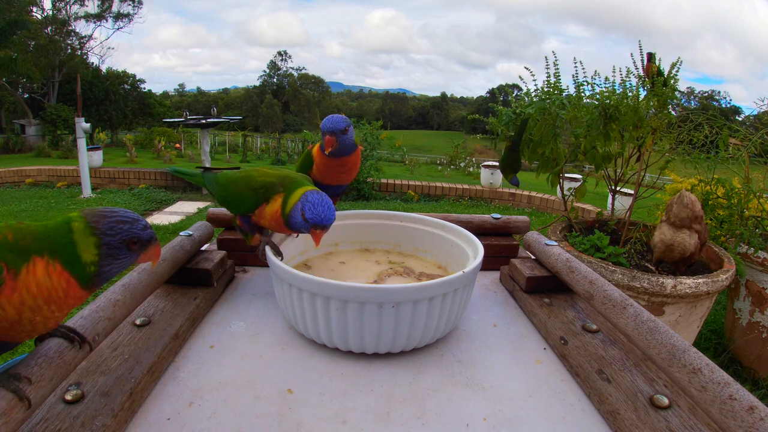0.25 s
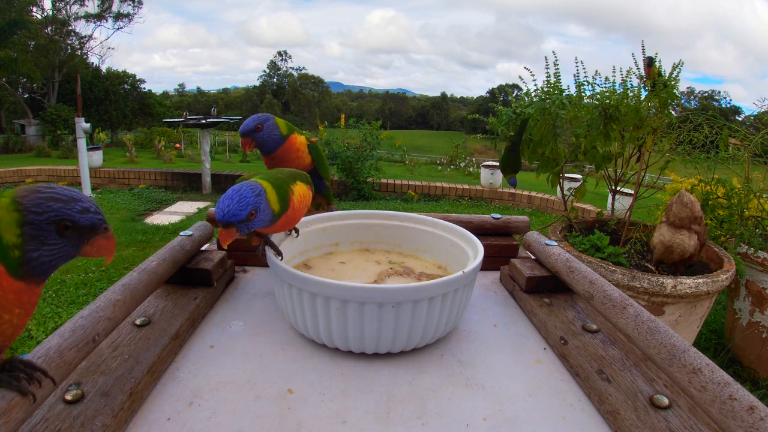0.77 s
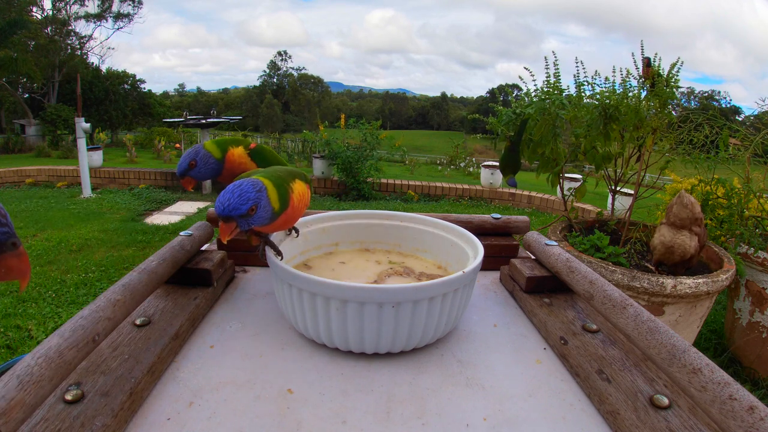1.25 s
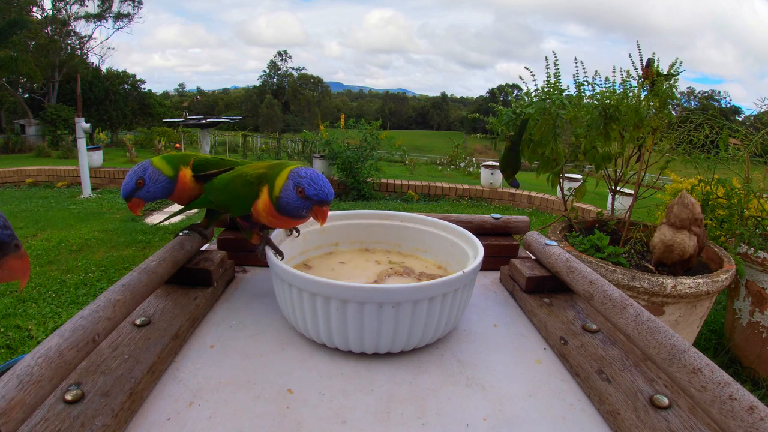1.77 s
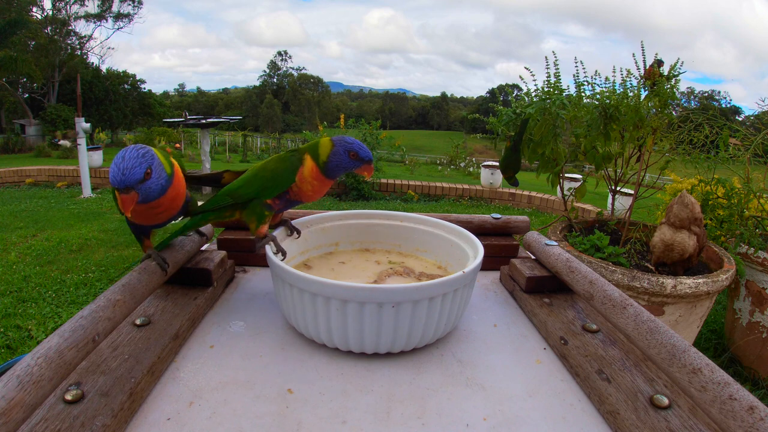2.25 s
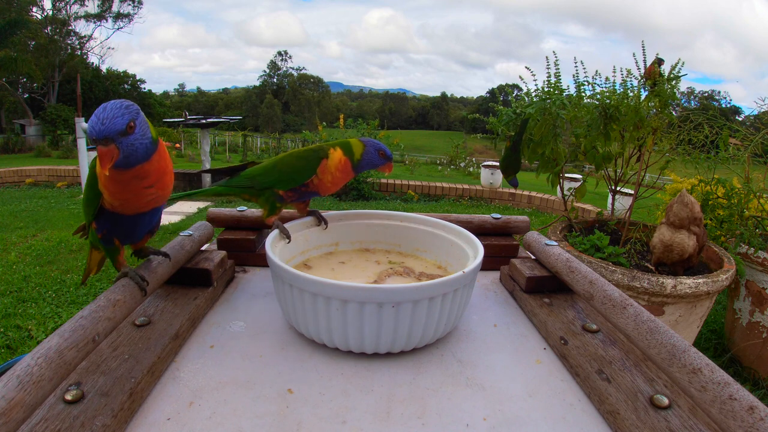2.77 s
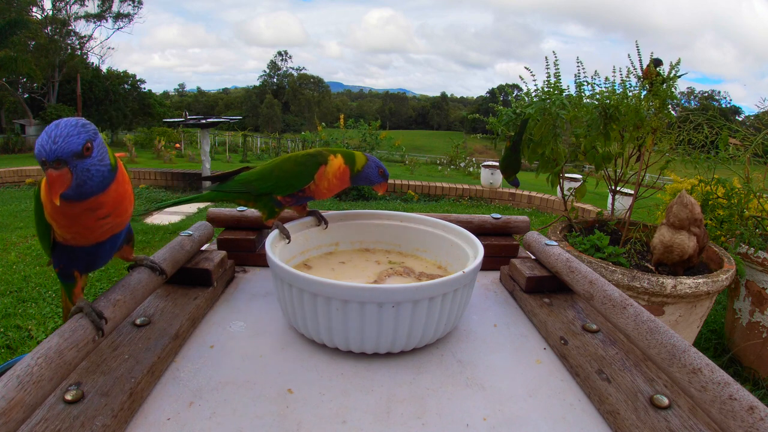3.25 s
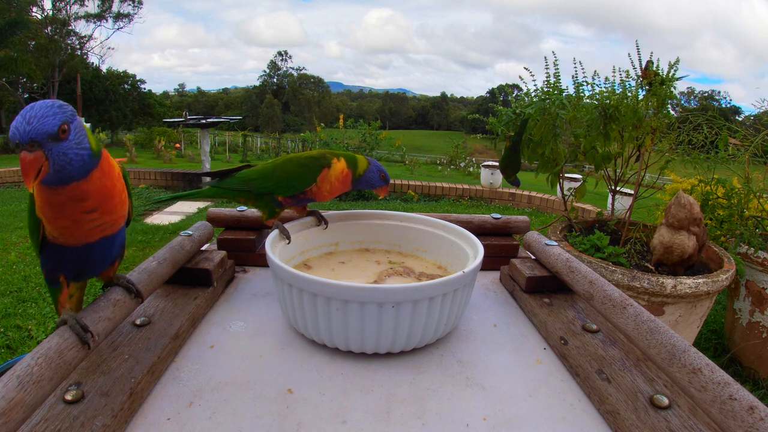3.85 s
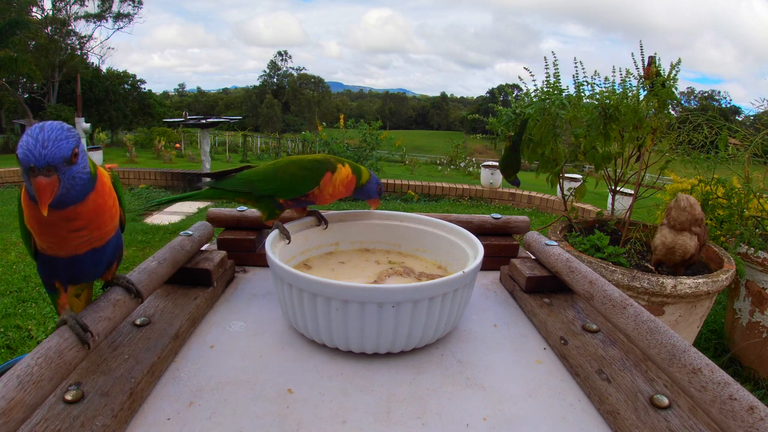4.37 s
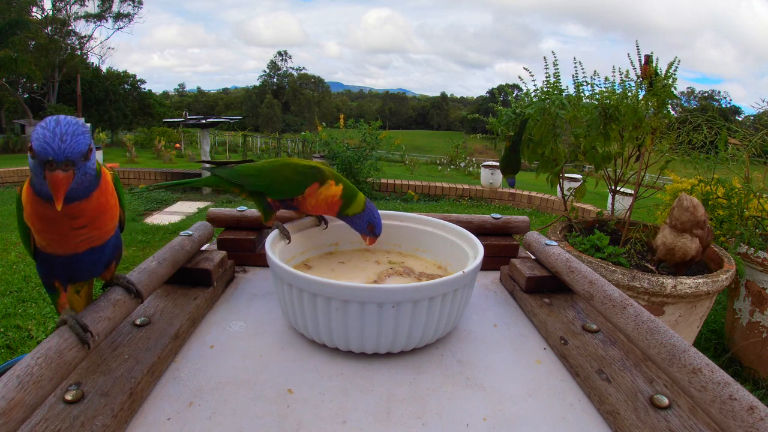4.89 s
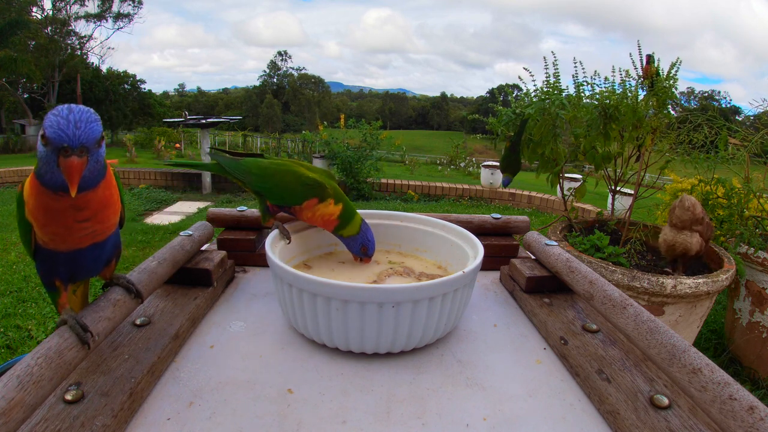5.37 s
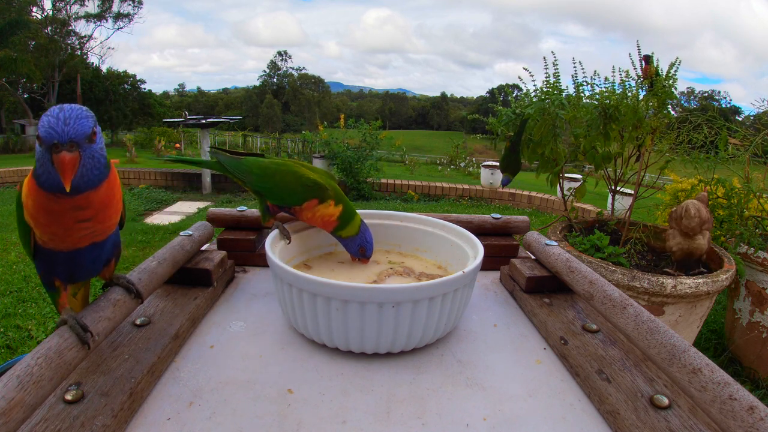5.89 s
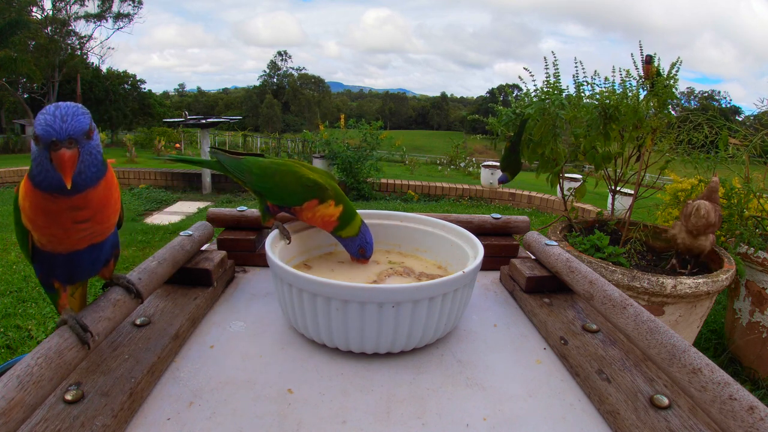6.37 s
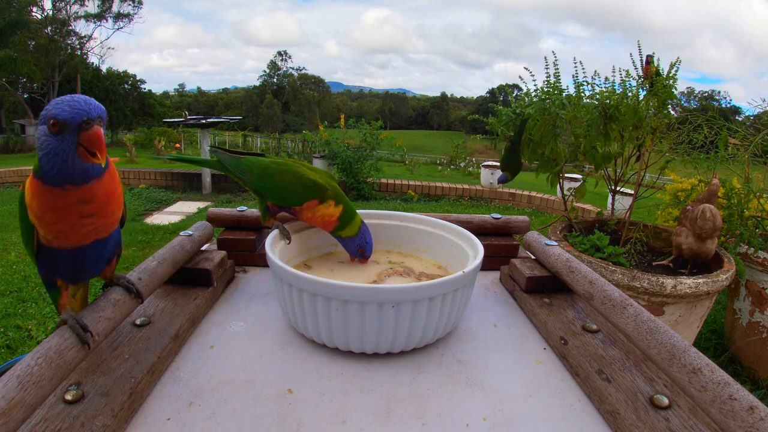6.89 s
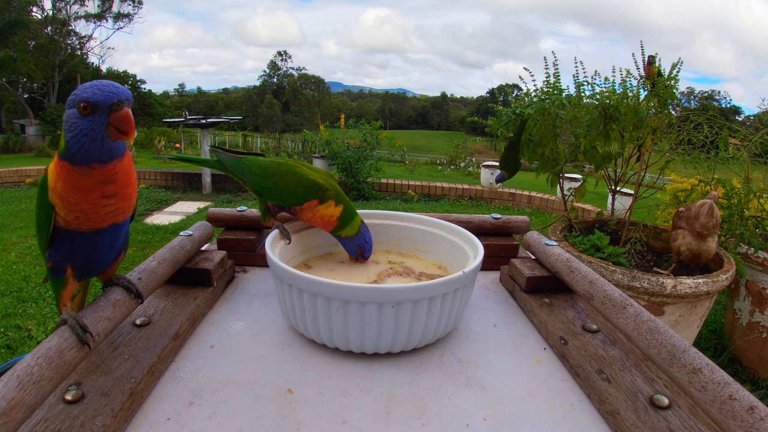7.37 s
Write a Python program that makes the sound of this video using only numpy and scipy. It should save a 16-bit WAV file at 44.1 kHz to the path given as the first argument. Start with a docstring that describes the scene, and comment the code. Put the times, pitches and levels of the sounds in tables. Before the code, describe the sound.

Lorikeets call very close to a stereo microphone in an open garden. Short chirps open, then a harsh fluttering rasp and a sharp upward screech, a softer rasp, arching whistles and another screech. Quick chatter follows in bursts, with a brief wing flutter and a foot knocking on wood midway. Faint birds answer from trees over low hush and wind thumps.

```python
"""An open garden with a feeding bowl: lorikeets call close to a stereo microphone.
Membrane voices with throat-weighted overtones whistle, chatter and screech in two voices; two rasps
are pulse trains shaken by a flutter. Thin wavering tones answer from the trees.
Noise bursts make wings and a foot on a wooden rail; scattered echoes follow the calls.
Band noise makes the low country hush, a wavering hum and wind gusts on the microphone."""
import sys
import numpy as np
from scipy import signal
from scipy.io import wavfile
from scipy.ndimage import uniform_filter1d

SR = 44100
rng = np.random.default_rng(int(sys.argv[2]) if len(sys.argv) > 2 else 0)


def put_to_file(sound):
    """Save the sound as 16-bit audio at rate SR, in the file named by the first command-line argument."""
    columns = np.atleast_2d(sound).T  # one column per channel
    safe = np.clip(columns, -1, 1)
    whole_steps = np.round(safe * 32767)
    wavfile.write(sys.argv[1], SR, whole_steps.astype(np.int16))


N = 336483
T = np.arange(N) / SR
TOP_HZ = 15600


def undb(db):
    """Amplitude of a level in dB."""
    return 10 ** (np.asarray(db) / 20)


def band(x, lo_hz, hi_hz, order=2):
    """Butterworth band-pass."""
    return signal.sosfilt(signal.butter(order, [lo_hz, hi_hz], "band", fs=SR, output="sos"), x)


def unit(x):
    """Scales x to rms 1."""
    return x / np.sqrt(np.mean(x ** 2))


def noise(size=N):
    """White noise."""
    return rng.standard_normal(size)


def walk(rate_hz, size=N):
    """Smooth random curve of rms 1 that varies on the scale of 1 / rate_hz."""
    k = max(int(SR / rate_hz), 2)
    smooth = uniform_filter1d(uniform_filter1d(noise(size + 4 * k), k), k)
    return unit(smooth[2 * k:2 * k + size])


def turns(hz):
    """Phase in radians of a tone that follows a pitch curve."""
    return 2 * np.pi * np.cumsum(hz) / SR


def decay(t, t60_s):
    """Exponential decay by 60 dB in t60_s."""
    return np.exp(-np.log(1000) * t / t60_s)


def add(out, start_s, x):
    """Mixes x into out from start_s."""
    i = int(start_s * SR)
    a, b = max(i, 0), min(i + len(x), N)
    out[a:b] += x[a - i:b - i]


def played(rows, edge_s=0.0016):
    """Start, fade at both ends, and columns of a timed curve at every sample."""
    s, *columns = np.transpose(rows)
    t = np.arange(s[0] - edge_s, s[-1] + edge_s, 1 / SR)
    fade = np.clip(np.minimum(t - t[0], t[-1] - t) / edge_s, 0, 1)
    return t[0], fade, [np.interp(t, s, c) for c in columns]


# Throat response. Each row: frequency in Hz, overtone gain in dB.
THROAT = [(600, -6), (2000, 33.5), (3400, -5.5), (5000, 3), (6600, 1.5), (8000, -14.5), (10000, -19),
          (11500, -54.5), (15000, -33.5)]


def voice(hz, over_db, rough_rad, throat=THROAT):
    """Membrane tone of rms 1: the throat weighs its overtones, uneven cycles blur the upper ones."""
    phase = turns(hz) + rough_rad * walk(1500, size=len(hz))
    f, db = np.transpose(throat)
    tone, power = np.sin(phase), 1
    for k in range(2, 10):
        gain = undb(over_db + np.interp(np.log(k * hz), np.log(f), db)) * (k * hz < TOP_HZ)
        tone = tone + gain * np.sin(k * phase + k - 2)
        power = power + gain ** 2
    return np.sqrt(2 / power) * tone, phase


# Each row: start in seconds, rise in seconds, hold in seconds, top pitch in Hz, second voice in Hz,
# direct level in dB, second voice offset in dB, echo send in dB.
SCREECHES = [(-.025, 0.078, 0.0048, 2470, 3000, -44, -7, -44),
             (0.983, 0.077, 0.037, 2530, 3168, -23, -7.5, -45),
             (2.318, 0.087, 0.035, 2473, 3160, -22.5, -7.5, -48),
             (3.524, 0.1, 0.0056, 2593, 3050, -36, -9, -41),
             (3.997, 0.086, 0.031, 2420, 3040, -22, -7, -45.5),
             (4.546, 0.11, 0.021, 2560, 2980, -33.5, -9.5, -38),
             (5.346, .088, 0.025, 2438, 3094, -23, -6, -42.5),
             (5.404, 0.057, 0.035, 2560, 3220, -41.5, -31, -39),
             (6.797, 0.085, 0.1, 2609, 3050, -42, -22, -41.5),
             (6.936, 0.08, 0.038, 2462, 3050, -21.5, -3.5, -47.5)]
# Shape. Each row: stage (0-1 rise, then 1 plus hold lengths), first voice in dB, overtones in dB,
# second voice in dB, hiss in dB.
SCREECH_SHAPE = [(0, -44, -7, -61, -38.5), (0.229, -12.5, 12, -52, -25.5), (.42, -10, 2, -58.5, -14),
                 (0.699, -5, -1.5, -14.5, -17), (.93, -4, 0.5, 1.5, -31.5), (0.998, -2, -5, -3, -25),
                 (1.85, -8, -12, -3, -25), (2.299, -37, -28, -29, -46.5)]
# Climb. Each row: stage, first voice as share of top pitch, second voice as share of its pitch.
SCREECH_CLIMB = [(0, .45, .8), (.23, .56, .8), (.42, .73, .8), (.72, .85, .86), (.93, .965, .985),
                 (1, 1, 1)]
# Each row: frequency in Hz, overtone gain in dB.
SCREECH_THROAT = [(2400, 27), (3600, 0), (4600, -6.5), (5500, -17.5), (6600, 0), (8000, -27.5),
                  (10000, -19), (12000, -52.5)]
SETTLED_ROUGH_RAD, SLACK_ROUGH_RAD = .06, .6


def screeches():
    """Both sides of the syrinx glide up and settle; their clash adds sum and difference tones."""
    near, echo = np.zeros(N), np.zeros(N)
    for start_s, rise_s, hold_s, top_hz, second_hz, db, second_db, echo_db in SCREECHES:
        rows = [(min(u, 1) * rise_s + max(u - 1, 0) * hold_s, u, *rest) for u, *rest in SCREECH_SHAPE]
        _, fade, (stage, a_db, over_db, b_db, hiss_db) = played(rows)
        at, *shares = np.transpose(SCREECH_CLIMB)
        up_a, up_b = (np.interp(stage, at, share) for share in shares)
        # the slacker the membrane, the rougher
        rough = SETTLED_ROUGH_RAD + SLACK_ROUGH_RAD * (1 - up_a)
        a, pa = voice(top_hz * up_a, over_db, rough, SCREECH_THROAT)
        pb = turns(second_hz * up_b)
        clash = undb(-14) * np.sin(pa + pb) + undb(-18) * np.sin(2 * pb)
        clash = clash + undb(-22) * np.sin(2 * pb - pa) + undb(-28) * np.sin(2 * pa - pb)
        second = undb(b_db + second_db) * (np.sqrt(2) * np.sin(pb) + clash)
        # air rushes past once every second cycle: faint half-pitch lines
        rush = band(np.cos(pa / 2) ** 21, 2400, 8000, order=4)
        hiss = unit(band(noise(len(a)), 2000, 7500, order=3) + .8 * rush)
        first = undb(a_db) * a + undb(hiss_db + 2.5 * walk(340, size=len(a))) * hiss
        add(near, start_s, undb(db) * band(fade * (first + second), 910, 6600, order=3))
        add(echo, start_s, undb(echo_db) * band(fade * first, 1200, 7000, order=3))
    return near, echo


# Spectrum. Each row: frequency in Hz, relative gain of white noise in dB.
HUSH_SPECTRUM = [(59, -31), (100, -5), (140, 4), (456, 7.5), (735, 10.5), (1200, -11.5), (1500, -13.5),
                 (1950, -29.5), (3300, -120)]
# Each row: time in seconds, level in dB.
HUSH_LEVEL = [(0, -57), (1.2, -72.5), (2.25, -73), (3.0, -63.5), (3.61, -56.5), (4.33, -71), (4.82, -62),
              (6.08, -73.5), (7.63, -63.5)]


def hush():
    """Low noise in half-octave bands that swell together and flicker alone."""
    f, db = np.transpose(HUSH_SPECTRUM)
    swell_db = 1.5 * walk(0.87)
    out = np.zeros(N)
    for hz in 45 * 2 ** np.arange(0, 5.6, .5):
        level_db = np.interp(np.log(hz), np.log(f), db) + swell_db + 2.5 * walk(5)
        out += undb(level_db) * band(noise(), hz / 2 ** .25, hz * 2 ** .25)
    return undb(np.interp(T, *np.transpose(HUSH_LEVEL))) * unit(out)


def hum():
    """Narrow noise round a low pitch, wavering in level."""
    hz, db = 128, -74.5
    return undb(db + 7.4 * walk(2.65)) * unit(band(noise(), hz - 14, hz + 14, order=1))


EDGE_S, ATTACK_S = .0031, 0.0034


def clock(length_s):
    """Seconds into a note, held still over the fades at both ends."""
    return np.clip(np.arange(-EDGE_S, length_s + EDGE_S, 1 / SR), 0, length_s)


# Each row: start in seconds, length in seconds, start and end pitch in Hz, start and end level in dB,
# overtones in dB.
GLIDES = [(0, 0.02, 1645, 2110, -31, -35, -7), (0.049, 0.036, 1684, 1810, -35, -36, -11),
          (0.375, 0.027, 1873, 1987, -32, -29, -4), (.392, 0.033, 1607, 1658, -32.5, -32.5, -9),
          (0.567, 0.028, 1975, 2065, -34.5, -31.5, -7), (3.487, 0.015, 2140, 2270, -53, -41.5, -10),
          (3.969, .004, 1996, 1940, -50, -39, -14.5), (3.980, 0.012, 2106, 2510, -28, -31, 0),
          (5.127, 0.011, 1730, 1773, -25, -29.5, 0), (5.731, 0.0097, 2310, 2270, -47, -35.5, 3),
          (5.769, 0.015, 2050, 1960, -31, -67, -11.5), (6.038, 0.023, 2436, 2333, -29.5, -30, -3.5),
          (6.154, 0.012, 2430, 2590, -29, -38, -1)]


def glides():
    """Pitch and level each run straight from start to end."""
    for start_s, length_s, hz0, hz1, db0, db1, over_db in GLIDES:
        u = clock(length_s) / length_s
        yield start_s, hz0 + (hz1 - hz0) * u, db0 + (db1 - db0) * u, over_db


OVERTONES_PER_DB, SHIMMER_DB = 0.75, 0.7
NOTE_ROUGH_RAD, NOTE_WOBBLE_SHARE = .06, .005


def chatter():
    """Clean notes from membrane voices, trilled in places; overtones thin out as a note weakens."""
    out = clucks()
    fall, fade_db = trills()
    # each kind yields start s, pitch curve Hz, level curve dB, overtones dB, throat if its own
    for kind in (glides, slides, low_notes, arches, steps, hooks, peeps):
        for start_s, hz, db, over_db, *throat in kind():
            n = len(hz)
            i = np.arange(n)
            fade = np.clip(np.minimum(i / ATTACK_S, i[::-1] / EDGE_S) / SR, 0, 1)
            at = np.clip(int((start_s - EDGE_S) * SR) + i, 0, N - 1)
            pitch = hz * (1 - fall[at] + NOTE_WOBBLE_SHARE * walk(120, size=n))
            thinned_db = over_db + OVERTONES_PER_DB * (db - db.max())
            tone, _ = voice(pitch, thinned_db, NOTE_ROUGH_RAD, *throat)
            level_db = db - fade_db[at] + SHIMMER_DB * walk(180, size=n)
            add(out, start_s - EDGE_S, fade ** 2 * undb(level_db) * tone)
    return out


# Each row: start in seconds, end in seconds, period in seconds, pitch fall as share, fade in dB.
TRILLS = [(0.051, .088, 0.011, 0.3, 14), (5.814, 5.87, .013, 0.11, 14)]


def trills():
    """Pitch falls through each beat and jumps back; level dips where the beats meet."""
    fall, fade_db = np.zeros(N), np.zeros(N)
    for start_s, end_s, period_s, share, db in TRILLS:
        beat = ((T - start_s) / period_s % 1 - .5) * (T > start_s) * (T < end_s)
        fall += share * beat
        fade_db += db * (2 * beat) ** 4
    return fall, fade_db


# Each row: start in seconds, seconds to the bend, seconds to the snap, opening, bend, pre-snap and
# snap pitch in Hz, opening, bend and closing level in dB, overtones in dB.
SLIDES = [(0.089, .045, .071, 1818, 2010, 1420, 1840, -29.5, -35.5, -33.5, -7.5),
          (0.181, 0.059, 0.087, 1682, 1964, 1472, 1830, -27.5, -39, -32.5, -9.5),
          (.289, 0.044, 0.076, 1637, 1748, 1400, 2090, -28.5, -29.5, -33.5, -10.5),
          (.598, 0.0217, .041, 1933, 2038, 2330, 2350, -32.5, -24, -31.5, -4),
          (5.822, 0.059, 0.092, 2058, 2244, 1824, 2370, -25.5, -28.5, -29, -6),
          (5.933, 0.012, 0.059, 2358, 2290, 1770, 2440, -27, -24.5, -30, -6),
          (6.009, .016, 0.028, 2474, 2174, 1725, 2370, -26, -24, -30.5, -5),
          (6.066, 0.014, .027, 1916, 2135, 1945, 2640, -26.5, -25, -28.5, -5.5),
          (6.124, 0.017, .022, 2316, 2200, 1860, 2420, -25.5, -24.5, -32, -3.5),
          (6.174, .023, 0.032, 1908, 2253, 2100, 2500, -28.5, -26, -28.5, -2),
          (6.229, 0.031, 0.036, 2384, 2180, 1960, 2660, -26, -24.5, -26.5, 1)]
CLIMB_TIME_SHARE, CLIMB_SHARE, SNAP_S, SNAP_DB = .3, 0.62, 0.0024, 4


def slides():
    """Notes glide, bend and snap to a new pitch as they close."""
    for start_s, bend_s, snap_s, open_hz, bend_hz, low_hz, snap_hz, db, bend_db, low_db, over_db in SLIDES:
        end_s = snap_s + SNAP_S
        t = clock(end_s)
        climb_hz = open_hz + CLIMB_SHARE * (bend_hz - open_hz)
        pitch = np.interp(t, [0, CLIMB_TIME_SHARE * bend_s, bend_s, snap_s, end_s],
                          [open_hz, climb_hz, bend_hz, low_hz, snap_hz])
        level = np.interp(t, [0, bend_s, (bend_s + snap_s) / 2, snap_s, end_s],
                          [db, bend_db, low_db, low_db, low_db + SNAP_DB])
        yield start_s, pitch, level, over_db


# Each row: start in seconds, level in dB, 60 dB fade in seconds.
GUSTS = [(0.308, -50, 0.35), (1.264, -70.5, 0.28), (1.393, -61, 0.35), (1.824, -62, 0.74),
         (2.268, -64.5, 0.38), (2.523, -60, 1), (2.999, -50, 0.53), (3.227, -46.5, 0.25),
         (3.438, -44.5, 0.63), (3.699, -48.5, 0.38), (3.922, -53.5, 1.66), (4.904, -53, 0.27),
         (5.8, -66, 1.8), (6.938, -46.5, 0.14)]


def gusts():
    """Wind thumps the microphone: low noise, quick onset, exponential fade."""
    level = np.zeros(N)
    for start_s, db, fade_s in GUSTS:
        onset = np.clip((T - start_s) / 0.01, 0, 1)
        level += undb(db) * onset * decay(np.maximum(T - start_s, 0), fade_s)
    return level * unit(band(noise(), 61, 230))


# Each row: start in seconds, length in seconds, pitch in Hz, opening level in dB.
LOW_NOTES = [(0.35, .03, 2070, -38), (5.063, 0.016, 1790, -34.5), (5.088, 0.03, 1760, -34),
             (5.145, 0.011, 1780, -45)]
SINK_S, SINK_SHARE, LOW_FADE_DB, LOW_OVERTONES_DB = 0.018, 0.21, -11.5, -14.5


def low_notes():
    """The other side of the syrinx joins in, fades and sinks at the end."""
    for start_s, length_s, hz, db in LOW_NOTES:
        t = clock(length_s)
        sink = SINK_SHARE * np.maximum(t - length_s + SINK_S, 0) / SINK_S
        yield start_s, hz * (1 - sink), db + LOW_FADE_DB * t / length_s, LOW_OVERTONES_DB


# One list per rasp. Each row: time in seconds, pitch in Hz, flutter in Hz, level in dB,
# pitch jitter as share.
RASPS = [
    [(.7, 898, 92.4, -54, .05), (.72, 947, 93.7, -28, 0.044), (.85, 902, 93.1, -28.5, 0.033),
     (.99, 900, 93.9, -29, 0.022), (1.012, 816, 94, -37, 0.046)],
    [(1.215, 770, 74.8, -60, 0.021), (1.24, 788, 72.4, -41, 0.045), (1.4, 742, 76.2, -37.5, 0.03),
     (1.55, 779.5, 72.4, -34.5, 0.057), (1.568, 787, 69.7, -42.5, 0.033)],
]
# One list per rasp. Each row: resonance in Hz, width in Hz, gain in dB; the first row gives only
# the gain of the fundamental.
RASP_THROATS = [
    [(904, 60, -8), (2110, 1300, 0.5), (2657, 430, 6.5), (3470, 840, -1.5), (5380, 890, 1),
     (6900, 370, -7.5)],
    [(750, 60, 0), (1440, 570, 8.5), (3080, 320, 6.5), (4120, 210, 4.5), (5090, 340, 8), (6810, 600, -8)],
]
# Each row: pitch leap as share, sharpness as power, swell as share, fade of the fundamental as share.
RASP_LEAPS = [(0.57, 2.9, 1.05, 1), (0.34, 2.9, 0.67, 0.45)]


def rasps():
    """Low voice shaken by a slow second vibration: each flutter leaps up, turns breathy, sags back."""
    out = np.zeros(N)
    for rows, throat, (share, sharpness, swell, dip) in zip(RASPS, RASP_THROATS, RASP_LEAPS):
        start_s, fade, (hz, flutter_hz, db, jitter) = played(rows)
        n = len(hz)
        cycle = np.cumsum(flutter_hz * (1 + 0.057 * walk(66, size=n))) / SR % 1
        leap = np.abs(2 * cycle - 1) ** sharpness
        phase = turns(hz * (1 + share * (leap - .08) + jitter * walk(440, size=n)))
        pulses = unit(sum(np.cos(k * phase) for k in range(2, 12)))
        pulses = pulses * (1 + swell * leap) * undb(1.6 * walk(150, size=n))
        breath = (.12 + .5 * leap) * noise(n) * (1 + np.cos(phase))
        source = pulses + breath
        rung = np.zeros(n)
        for k, (f, width, gain_db) in enumerate(throat[1:]):
            rung += (-1) ** k * undb(gain_db) * band(source, f - width / 2, f + width / 2)
        # the fundamental fades at the top of each leap
        low = undb(throat[0][2]) * (1 - min(dip, 1) * leap) * np.sin(phase)
        rasp = unit(rung + undb(-21) * band(source, 2100, 8300) + low)
        add(out, start_s, fade * undb(db) * rasp)
    return out


# Throat of the arched and stepped whistles. Each row: frequency in Hz, overtone gain in dB.
WHISTLE_THROAT = [(3400, 1.5), (4300, 3.5), (5200, 12.5), (6600, -4.5), (8000, -12), (10000, -18.5),
                  (11500, -49), (15000, -39)]
# Each row: start in seconds, length in seconds, low and top pitch in Hz, level in dB when low, in the
# climb, on arrival, on the plateau and before the fall, overtones in dB.
ARCHES = [(1.195, .154, 1817, 2436, -38, -42, -42.5, -33, -29, -7.5),
          (1.536, 0.15, 1895, 2628, -33, -38, -24.5, -29.5, -23.5, -3.5),
          (1.923, 0.14, 1997, 2650, -34, -30.5, -27, -25, -24, -3.5)]
# Each row: share of length, share of the climb.
ARCH_SHAPE = [(0, 0.0057), (.17, 0.034), (.28, .3), (.41, .72), (.62, .88), (.84, 1), (.9, 0.87), (1, 0.3)]
ARCH_END_DB = -10.5


def arches():
    """Whistles climb to a plateau and fall."""
    for start_s, length_s, low_hz, top_hz, low_db, climb_db, arrive_db, flat_db, last_db, over_db in ARCHES:
        u = clock(length_s) / length_s
        at, up = np.transpose(ARCH_SHAPE)
        pitch = low_hz + (top_hz - low_hz) * np.interp(u, at, up)
        level = np.interp(u, at, [low_db, low_db, climb_db, arrive_db, flat_db,
                                  last_db, last_db, last_db + ARCH_END_DB])
        yield start_s, pitch, level, over_db, WHISTLE_THROAT


# Each row: start in seconds, seconds to the break, length in seconds, high and low pitch in Hz,
# high, low and closing level in dB, overtones in dB.
STEPS = [(1.813, .030, .092, 3510, 2198, -26, -32.5, -27, -6),
         (2.111, .030, 0.089, 3586, 2202, -28, -26.5, -25, -1.5)]
BREAK_S, BREAK_SAG_SHARE, LIFT_S, LIFT_SHARE = .010, .14, .022, 0.055


def steps():
    """Whistles break from a high tone to a low one and lift at the end."""
    for start_s, cut_s, length_s, high_hz, low_hz, high_db, low_db, close_db, over_db in STEPS:
        t = clock(length_s)
        lifted_hz = low_hz * (1 + LIFT_SHARE)
        times = [0, cut_s - BREAK_S, cut_s - .001, cut_s, cut_s + BREAK_S, length_s - LIFT_S, length_s]
        pitch = np.interp(t, times, [high_hz, high_hz * .985, high_hz * (1 - BREAK_SAG_SHARE),
                                     lifted_hz, low_hz, low_hz, lifted_hz])
        level = np.interp(t, times, [high_db, high_db, high_db, low_db, low_db, low_db, close_db])
        yield start_s, pitch, level, over_db, WHISTLE_THROAT


# Each row: start in seconds, length in seconds, start and end pitch in Hz, mid level in dB.
FAR_CALLS = [(2.205, 0.13, 2016, 1980, -53.5), (2.21, 0.069, 3080, 3370, -55),
             (2.519, 0.011, 3590, 3410, -54.5), (2.523, 0.1, 5830, 4590, -77),
             (2.602, 0.065, 3250, 3470, -67.5), (3.043, 0.023, 3460, 2840, -52.5),
             (3.255, 0.018, 3460, 2940, -49), (3.455, 0.062, 4570, 5500, -51),
             (3.466, 0.071, 6480, 6160, -54.5), (6.46, 0.025, 4280, 4120, -77),
             (6.701, 0.07, 3240, 3010, -65), (7.504, .04, 6060, 5580, -75.5),
             (3.201, 0.094, 4600, 5300, -72), (3.39, 0.14, 4090, 3854, -50.5),
             (4.53, 0.03, 2920, 2480, -48), (5.6, 0.05, 4500, 4116, -65), (5.65, 0.032, 3500, 3570, -63.5),
             (5.672, 0.062, 4800, 5100, -67), (6.446, 0.059, 5380, 5280, -70),
             (6.548, 0.47, 2065, 2191, -58), (6.622, 0.054, 4170, 4130, -80.5),
             (6.64, 0.065, 3640, 3450, -72.5), (6.669, 0.073, 5200, 5110, -69.5),
             (7.19, 0.084, 4680, 4178, -69.5), (7.094, 0.59, 5450, 5430, -77),
             (7.494, 0.022, 4260, 4340, -75), (7.535, 0.083, 2930, 3090, -70)]
# Each row: start in seconds, mid level in dB.
TUMBLES = [(2.572, -61.5), (2.708, -56.5), (6.336, -62.5), (6.467, -57)]
# Pitch of a call that tumbles down two steps. Each row: time in seconds, pitch in Hz.
TUMBLE_SHAPE = [(0, 2907), (.02, 2276), (.028, 2133), (.05, 2120), (0.074, 1605)]


def far_birds():
    """Birds in the trees: thin whistles wavering in pitch and level, with a faint octave."""
    out = np.zeros(N)
    at, tumble_hz = np.transpose(TUMBLE_SHAPE)
    tumble = np.interp(np.arange(0, at[-1], 1 / SR), at, tumble_hz)
    calls = [(s, np.linspace(hz0, hz1, int(length_s * SR)), db) for s, length_s, hz0, hz1, db in FAR_CALLS]
    calls += [(s, tumble, db) for s, db in TUMBLES]
    for start_s, hz, db in calls:
        n = len(hz)
        phase = turns(hz * (1 + .01 * walk(150, size=n)))
        level = undb(db + 6.75 * walk(60, size=n)) * np.hanning(n) ** .5
        add(out, start_s, level * (np.sin(phase) + undb(-26.5) * np.sin(2 * phase)))
    return out


# Each row: start in seconds, seconds to the flick, opening pitch in Hz, body pitch in Hz,
# flick as share of pitch, peak, faded and flick level in dB, overtones in dB.
HOOKS = [(2.861, 0.012, 1860, 1950, 0.16, -46.5, -37, -33.5, 3),
         (2.886, 0.036, 2050, 1992, 0.077, -32, -42.5, -41, -4),
         (2.943, .034, 2010, 1987, 0.028, -32, -40.5, -36.5, -4),
         (2.995, 0.033, 2010, 1874, 0.067, -28, -41, -44, -5),
         (3.055, 0.023, 1930, 1965, .04, -32.5, -36.5, -37, -9),
         (3.11, 0.023, 1980, 1910, 0.21, -27.5, -39, -38, -4),
         (3.166, 0.021, 2044, 1973, 0.11, -28, -37, -28.5, -4.5),
         (3.219, 0.029, 1990, 1930, 0.19, -27, -32, -34, -3),
         (3.272, 0.032, 1820, 1972, 0.17, -25, -33.5, -27, -2),
         (3.324, 0.028, 1990, 1905, 0.17, -26.5, -30, -28, -4),
         (4.013, .020, 2260, 2183, 0.064, -27.5, -38.5, -28, -4),
         (4.12, 0.026, 2260, 2110, 0.2, -24.5, -36, -34.5, 1),
         (4.174, 0.027, 2315, 2183, .15, -24.5, -37, -29.5, 1),
         (4.235, 0.032, 2370, 2142, 0.14, -25.5, -31.5, -22.5, 1.5),
         (4.289, 0.033, 2290, 2184, .11, -25, -30.5, -26, 0),
         (4.348, 0.036, 2520, 2158, 0.25, -25.5, -25.5, -37, 1)]
SETTLE_S, HOLD_S, CLIMB_S, SWELL_S = 0.0049, 0.0035, .005, .004
DROP_S, DROP_SHARE, DROP_DB = 0.0049, .18, -5


def hooks():
    """Notes settle, fade, flick up and drop."""
    for start_s, flick_s, open_hz, hz, share, db, faded_db, flick_db, over_db in HOOKS:
        end_s = flick_s + DROP_S
        t = clock(end_s)
        climb = share * np.exp(np.minimum(t - flick_s, 0) / CLIMB_S)
        body = hz * (1 + climb) + (open_hz - hz) * np.exp(-t / SETTLE_S)
        pitch = body - hz * (share + DROP_SHARE) * np.maximum(t - flick_s, 0) / DROP_S
        times = np.sort([0, min(HOLD_S, flick_s / 3), flick_s - SWELL_S, flick_s, end_s])
        yield start_s, pitch, np.interp(t, times, [db, db, faded_db, flick_db, flick_db + DROP_DB]), over_db


# Each row: start in seconds, length in seconds, opening and top pitch in Hz, opening level in dB,
# overtones in dB.
PEEPS = [(3.376, 0.016, 2100, 2370, -42, -10), (3.44, 0.035, 2140, 2590, -46.5, -15),
         (4.773, 0.033, 2119, 2170, -27.5, -5), (4.832, 0.022, 2070, 2180, -35.5, -9.5),
         (4.869, 0.024, 1962, 2224, -26.5, -4.5), (4.912, 0.018, 1840, 2200, -27, -5.5),
         (4.953, 0.027, 1775, 2155, -26, -5.5), (4.999, 0.022, 1727, 2166, -26.5, -4.5),
         (5.041, 0.026, 1770, 2170, -26, -5.5), (5.086, 0.026, 1914, 2235, -27, -3.5),
         (5.136, .022, 1854, 2220, -28, -4), (5.182, 0.023, 1670, 2153, -26.5, -3.5),
         (5.774, .019, 2028, 2525, -27.5, -9)]
LEAP_S, PEEP_END_DB = .009, -11.5


def peeps():
    """Notes leap towards their top pitch and die away."""
    for start_s, length_s, open_hz, hz, db, over_db in PEEPS:
        t = clock(length_s)
        pitch = hz + (open_hz - hz) * np.exp(-t / LEAP_S)
        yield start_s, pitch, db + PEEP_END_DB * (t / length_s) ** 1.27, over_db


# Each row: time in seconds, level in dB before the burst envelope.
WINGS = [(3.691, -44.5), (3.7077, -42), (3.7404, -59.5), (3.752, -38), (3.77, -49.5), (3.883, -52)]


def wings():
    """Feathers sweep the air in soft noise bursts."""
    out, t = np.zeros(N), np.arange(int(.1 * SR)) / SR
    envelope = t / 0.022 * np.exp(1 - t / 0.0097)
    for start_s, db in WINGS:
        burst = unit(band(noise(len(t)), 1700, 5900, order=3))
        add(out, start_s - .004, undb(db) * envelope * burst)
    return out


def knock():
    """A foot lands on the wooden rail: decaying noise, strongest in a middle band."""
    start_s, drive_db, hz, t60_s = 3.741, -34, 1320, 0.027
    t = np.maximum(T - start_s, 0)
    rattle = noise() * (t > 0) * decay(t, t60_s)
    return undb(drive_db) * (6 * band(rattle, 0.81 * hz, 1.8 * hz) + band(rattle, 2000, 7000))


# Each row: time in seconds, level in dB, pitch in Hz.
CLUCKS = [(5.9072, -25.5, 1208), (5.9827, -26, 1190), (6.0335, -29, 1190), (6.0926, -42.5, 1346),
          (6.147, -33, 1255), (6.2615, -49, 1295)]


def clucks():
    """Short low tones as the membranes slap shut."""
    out, n = np.zeros(N), int(0.013 * SR)
    for start_s, db, hz in CLUCKS:
        tone, _ = voice(np.full(n, float(hz)), over_db=-13., rough_rad=.14)
        add(out, start_s - .002, undb(db) * np.hanning(n) * tone)
    return out


def air():
    """Hush, hum and gusts in both channels, plus faint low noise in opposite phase."""
    mid = hush() + hum() + gusts()
    return mid + undb(-94.5) * unit(band(noise(), 100, 400)) * np.array([[1], [-1]])


def echoes(x, t60_s, apart):
    """Scattered returns from fences and trees, duller with time, almost the same in both channels."""
    t = np.arange(int(t60_s * 1.2 * SR)) / SR
    mid, side = noise((2, len(t))) * (1 - np.exp(-t / 0.0097))
    low = decay(t, t60_s)
    scatter = np.array([mid + apart * side, mid - apart * side])
    # the treble band decays 3.4 times as fast
    tail = band(scatter * low, 430, 3500, order=1)
    tail = tail + band(tail * 0 + scatter * low ** 3.4, 2400, 7500, order=2)
    return signal.fftconvolve(x[None], tail / np.sqrt(np.sum(tail[0] ** 2)), axes=1)[:, :N]


def scene():
    """Near birds, far birds, their echoes and the air, in stereo."""
    screech, screech_echo = screeches()
    near = chatter() + rasps() + screech + wings() + knock()
    far = far_birds()
    # the two channels differ a little in the treble
    side = undb(-24) * band(near, 4000, 14000, order=1) * walk(8) * np.array([[1], [-1]])
    near_echo = undb(-28.0) * echoes(near, t60_s=0.35, apart=.15)
    trees = echoes(screech_echo + undb(-10) * far, t60_s=0.5, apart=0.23)
    return near + side + far + near_echo + trees + air()


def record(dry):
    """Loud calls pull the bass gain down for a moment; peaks are rounded and the top is cut."""
    loud = uniform_filter1d(np.abs(dry[0]), int(0.057 * SR))
    bass = signal.sosfiltfilt(signal.butter(2, 500, fs=SR, output="sos"), dry)
    ducked = dry - bass * (1 - 1 / (1 + loud / 0.23))
    rounded = .3 * np.tanh(ducked / .3)
    return signal.sosfilt(signal.ellip(8, .2, 70, TOP_HZ, fs=SR, output="sos"), rounded)


dry = scene()
out = record(dry)
put_to_file(out)
```